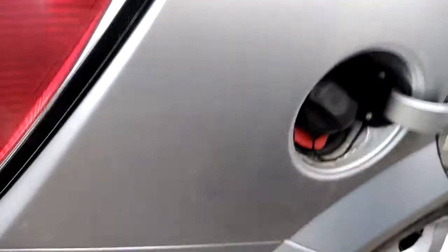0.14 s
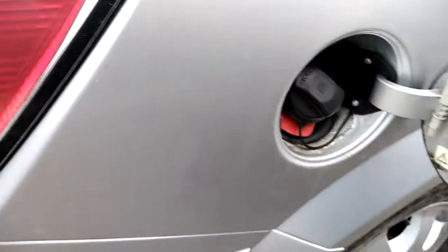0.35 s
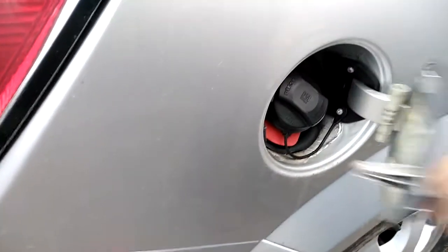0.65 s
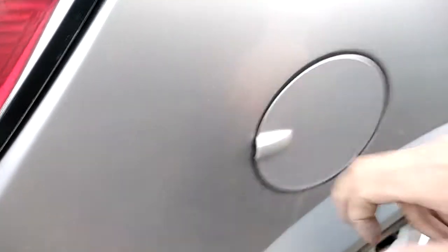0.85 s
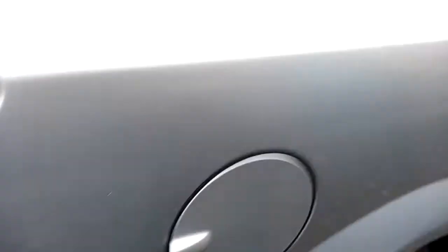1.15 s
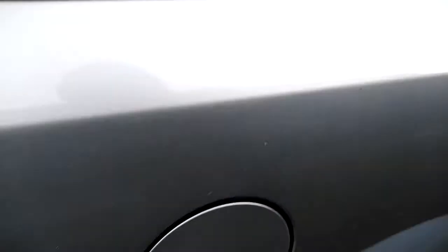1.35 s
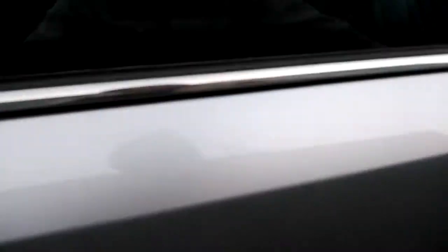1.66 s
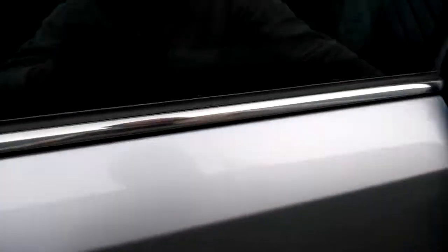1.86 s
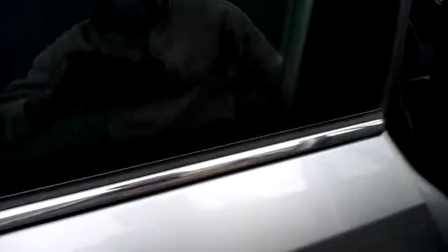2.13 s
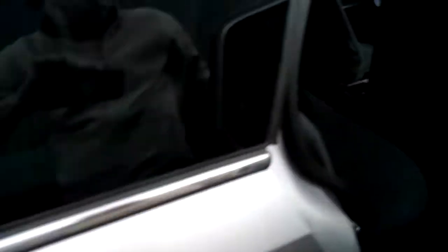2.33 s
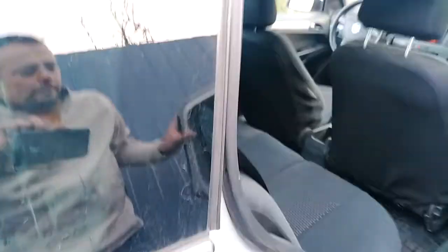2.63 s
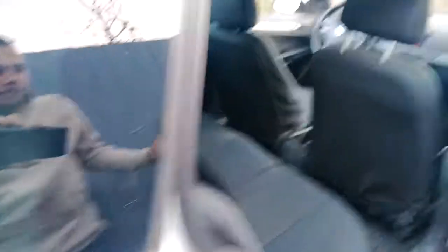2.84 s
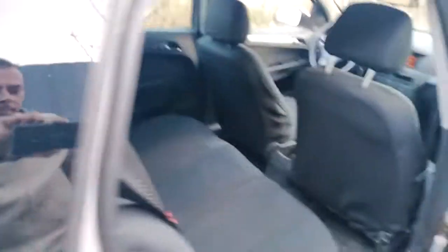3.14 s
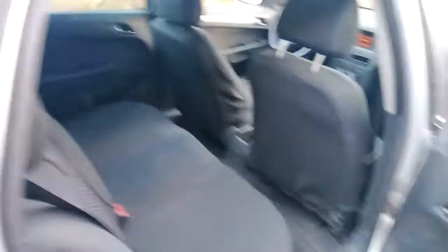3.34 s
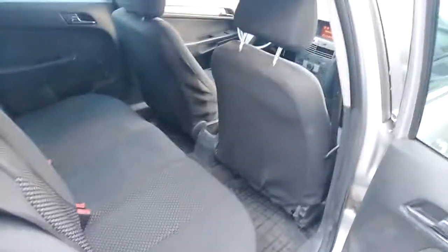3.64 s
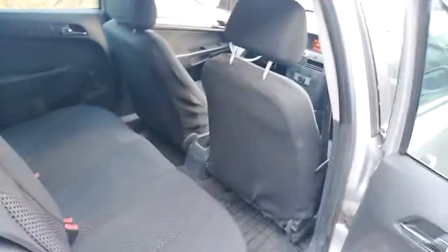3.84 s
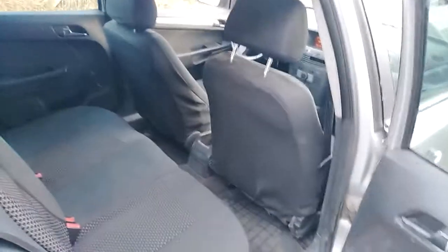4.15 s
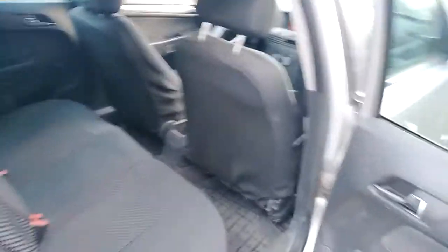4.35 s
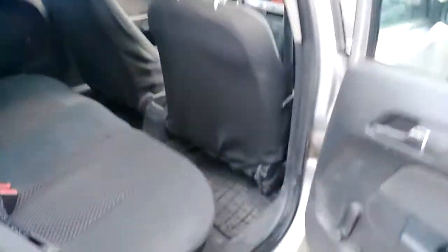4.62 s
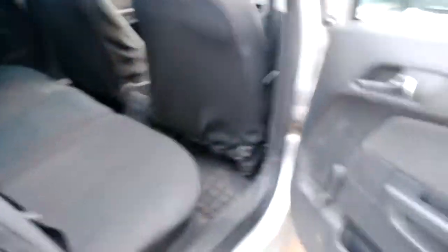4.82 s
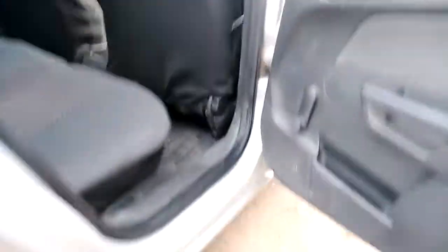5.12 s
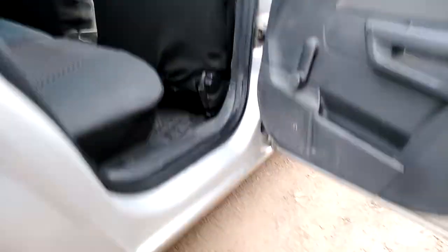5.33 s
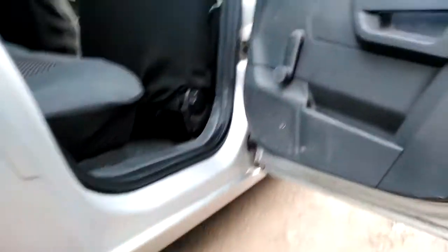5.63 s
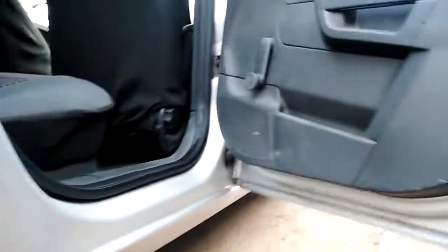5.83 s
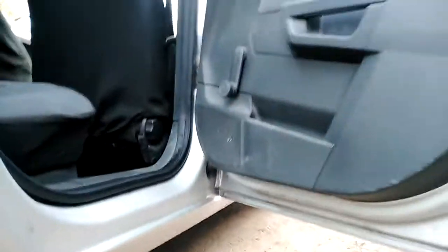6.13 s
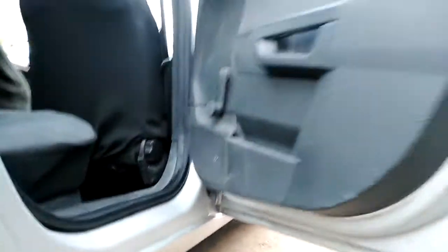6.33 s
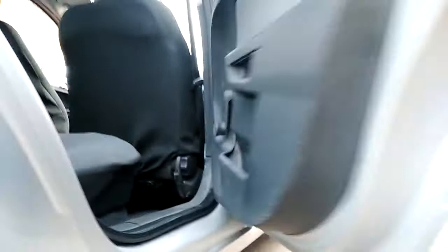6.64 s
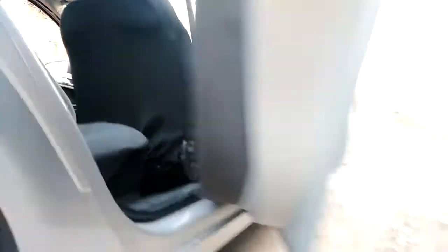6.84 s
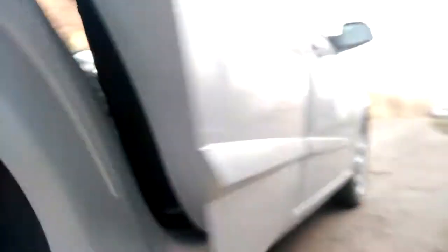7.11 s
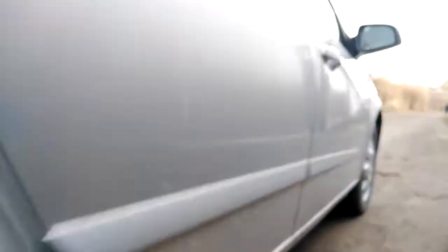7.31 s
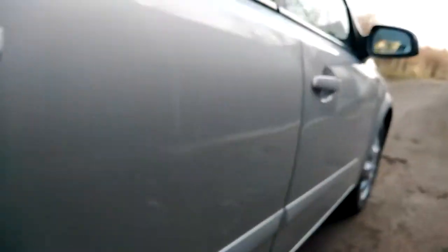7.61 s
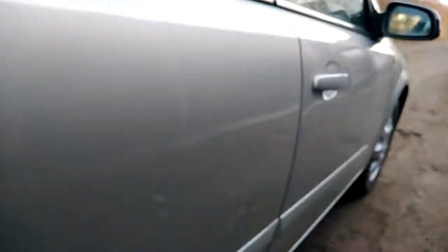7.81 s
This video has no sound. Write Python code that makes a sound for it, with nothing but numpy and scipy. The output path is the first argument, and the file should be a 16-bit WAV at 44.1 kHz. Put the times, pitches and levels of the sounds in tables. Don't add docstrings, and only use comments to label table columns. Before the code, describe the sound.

A hand works along an idling diesel car in the open air. First a sharp flap clap, then a heavy handle clunk, a metallic latch release, a faint brief squeak and a duller stop knock. For several seconds only the fast chugging idle remains, growing hissier and nearer the engine. Near the end the catch clacks and the door slams with a deep boom. Close stereo microphone, very little echo.

```python
import sys
import numpy as np
from scipy import signal
from scipy.fft import rfft, irfft, next_fast_len
from scipy.io import wavfile
from scipy.ndimage import uniform_filter1d, map_coordinates

SR = 44100
rng = np.random.default_rng(int(sys.argv[2]) if len(sys.argv) > 2 else 0)


def undo_db(level):
    steps = np.asarray(level, float) / 20
    return 10 ** steps


def transcribe(signal):
    frames = np.atleast_2d(signal).T
    limited = np.clip(frames, -1, 1)
    pcm = np.round(limited * 32767).astype(np.int16)
    wavfile.write(sys.argv[1], SR, pcm)


N = 351477

# time in seconds, how far the microphone is inside the cabin (0-1), nearness
# to the engine bay in dB, open line to the bay (0-1), delay of the right port in samples.
WALK = [(0, 0, -0.5, 0.64, 17.3), (.55, 0.14, -0.5, 0.88, 15.3), (1.0, 0, -0.5, 0.8, 15),
        (1.5, 0.1, 1.5, 0.67, 17.2), (2.0, 0.1, 1, 0.83, 17.3), (2.15, 0.6, 0, 0.7, 22),
        (2.7, 0.8, -1, 0.82, 16.6), (3.1, 1, -0.5, 0.48, 15.5), (4.4, 1, -0.5, .5, 18.3),
        (5.0, 1, 2.5, 0.56, 18), (5.5, 0.24, 5, 0.94, 3.8), (5.899, 0.23, 6, 0.94, 2.7),
        (7.2, 0, 6, 0.91, 3.3), (7.5, 0, 4.5, 0.83, 5.4), (7.97, 0.16, 5, .95, 8)]
# level in dB, loss inside the cabin in dB, dB per dB of nearness.
KNOCK_FOLLOW = (-38, 2, 0.71)


def evened(x):
    return x / np.sqrt(np.mean(x ** 2) + 1e-20)


def read(points, hz):
    f, value = np.transpose(points)
    return np.interp(np.log(hz + 1), np.log(f + 1), value)


def coloured(x, points, share=0.99):
    length = x.shape[-1]
    size = next_fast_len(length)
    gain = undo_db(share * read(points, np.fft.rfftfreq(size, 1 / SR)))
    return irfft(rfft(x, size) * gain, size)[..., :length]


def add(mix, s, sound):
    part = mix[..., round(s * SR):][..., :sound.shape[-1]]
    part += sound[..., :part.shape[-1]]


def panned(x, pan_db):
    return x * undo_db(np.array([[pan_db / 2], [-pan_db / 2]]))


def ring(x, hz, width):
    r = np.exp(-np.pi * width / SR)
    return signal.lfilter([1, 0, -1], [1, -2 * r * np.cos(2 * np.pi * hz / SR), r * r], x)


def yard(x, t60, wet_db):
    taps = rng.standard_normal((2, 6000)) * (rng.random((2, 6000)) < .04)
    taps *= undo_db(-60 * np.arange(6000) / SR / t60)
    taps /= np.linalg.norm(taps, axis=1)[:, None]
    return x + undo_db(wet_db) * signal.fftconvolve(x, taps, axes=1)[:, :N]


def heard(law, jolt_column=None):
    # time in seconds, extra hum in dB, extra drumming in dB, seconds to fall by 60 dB.
    jolts = [
        (.85, -48, -42, .9),
        (1.86, -34, -27.5, 0.83),
        (2.33, -40, -32, 0.98),
        (4.75, -70, -44, 1.5),
        (7.35, -20, -29, 0.72),
    ]
    t = np.arange(N) / SR
    s, inside, near_db = np.transpose(WALK)[:3]
    level_db, inside_db, follow = law
    gain = undo_db(level_db - inside_db * np.interp(t, s, inside) + follow * np.interp(t, s, near_db))
    for row in jolts if jolt_column else []:
        since = np.maximum(t - row[0], 0)
        rise = 1 - np.exp(-since / 0.037)
        gain = gain + undo_db(row[jolt_column] - 60 * since / row[-1]) * rise
    return gain


def struck(parts, beats, turns, air, spread_db, rough, burst_s, jitter_s):
    count = np.arange(int(turns[-1]) + 1)
    at = np.searchsorted(turns, count)
    out, fade = np.zeros(N), np.exp(-np.arange(1200) / SR / burst_s)
    for (hz, width, db, air_db), (delay, *cylinders) in zip(parts, beats):
        hits = np.zeros(N)
        size = undo_db(np.array(cylinders)[count % 4] + spread_db * rng.standard_normal(len(at)))
        late = delay + jitter_s * rng.standard_normal(len(at))
        hits[np.clip(at + (late * SR).astype(int), 0, N - 1)] = size
        burst = signal.oaconvolve(hits, fade)[:N] * rng.standard_normal(N)
        push = evened(ring(hits, hz, width))
        noise = evened(ring(burst, hz, width))
        drive = (1 - rough) * push + rough * noise
        tone = evened(ring(drive, hz, width))
        out += undo_db(db + air_db * (2 * air - 0.5)) * tone
    return evened(out)


def throb(turns, depth, fall):
    size = undo_db(2.24 * rng.standard_normal(int(turns[-1]) + 9))[turns.astype(int) + 1]
    swell = uniform_filter1d(size * np.exp(-(turns % 1) / fall), size=330, origin=60)
    return evened(1 - depth + depth * 3 * swell)


def low_hum(turns, air):
    # multiple of firing rate, level in dB, start in turns, rise in open air in dB.
    orders = [(2, 3, 0.26, -2), (3, 5, 0.29, 6), (4, -37, 0.83, 21.5), (6, -18, 0.46, -6)]
    hum_follow = (-40.5, 11.6, 0.059)
    hum = sum(undo_db(db + air_db * (2 * air - 2)) * np.cos(2 * np.pi * (k * turns + start))
              for k, db, start, air_db in orders)
    return heard(hum_follow, 1) * evened(hum)


def exhaust_boom(turns, air):
    # pitch in Hz, width in Hz, level in dB, rise in open air in dB.
    pipe_tones = [(248.8, 40.6, 2.5, 0), (244.4, 22.8, -1.5, -1.5), (200, 78, -9.5, -13),
                  (317.7, 15, -7.5, 1), (350.8, 34, -8, 2), (425.6, 35.5, -13.5, 5)]
    # delay after firing in seconds, then dB of cylinders one to four.
    pipe_beats = [(.003, -7, 0, -8, 0), (.016, -6, 0, -6, -1), (.006, -3, 0, -3, 0), (.004, 0, 0, -2, -2),
                  (0, 0, 1, -2, -2), (.002, 0, 0, 0, 0)]
    boom_follow = (-33.5, 1.5, 0.069)
    boom = struck(pipe_tones, pipe_beats, turns, air, spread_db=1.3, rough=.15, burst_s=.008, jitter_s=.0001)
    return yard(heard(boom_follow) * boom[None], t60=0.35, wet_db=-29.0)


def block_knock(turns, air):
    # pitch in Hz, width in Hz, level in dB, rise in open air in dB.
    block_tones = [(593, 91, -0.5, -9.5), (727.4, 71, 2, -1), (932, 71, -6.5, 1), (1110, 44, -6.5, 2.5),
                   (1234, 195, -4.5, 4.5), (1396, 180, -3, -7), (1728, 210, -2, 2), (2234, 400, -11.5, 0.5)]
    # delay after firing in seconds, then dB of cylinders one to four.
    block_beats = [(.004, 0, 0, 0, 0), (.006, 1, -2, -1, 2), (.004, -2, 4, 0, -3), (.002, 0, 0, 0, 0),
                   (.005, -4, -3, 6, -4), (.001, 0, 0, 3, 0), (.001, 1, 1, 0, -3), (.001, 0, 0, 0, 0)]
    knock = struck(block_tones, block_beats, turns, air, spread_db=1.5, rough=.32, burst_s=.011, jitter_s=.0003)
    return yard(heard(KNOCK_FOLLOW) * knock[None], t60=0.076, wet_db=-1.5)


def valve_wash(turns, common):
    # pitch in Hz, level in dB per Hz.
    wash_colour = [(260, -41), (450, -5), (715, 5), (1030, -4.5), (1260, -13), (1430, -2.5), (1760, -4.5),
                   (2820, -23), (3500, -6), (4550, -42), (7700, -120)]
    noise = rng.standard_normal((2, N)) + 1.54 * common
    wash = evened(coloured(noise, wash_colour)) * throb(turns, depth=0.56, fall=0.34)
    return heard(KNOCK_FOLLOW) * wash


def injector_hiss(turns, common):
    # pitch in Hz, level in dB per Hz.
    hiss_colour = [(1180, 0.5), (2000, -2.5), (2500, -6), (2750, -7), (3330, -9.5), (3920, -12.5),
                   (4390, -6.5), (4930, -8), (6200, -4), (6960, -3.5), (7930, 1.0), (10200, -17.5),
                   (14200, -30.5), (14700, -90)]
    hiss_follow = (-40.5, 0.092, 1.017)
    noise = rng.standard_normal((2, N)) + 0.27 * common
    hiss = evened(coloured(noise, hiss_colour)) * throb(turns, depth=0.35, fall=0.49)
    return heard(hiss_follow) * hiss


def engine():
    t = np.arange(N) / SR
    s, *columns = np.transpose(WALK)
    air, lag = (np.interp(t, s, c) for c in columns[2:])
    turns = 27.826 * t + .12
    common = rng.standard_normal(N)
    near = exhaust_boom(turns, air) + block_knock(turns, air)
    body = undo_db(-1.5) * near + undo_db(-5.5) * valve_wash(turns, common)
    body[1] = map_coordinates(body[1], [np.arange(N) - lag], order=3)
    return low_hum(turns, air) + body + undo_db(3.0) * injector_hiss(turns, common)


def drumming():
    drum_follow = (-51, 13, -0.37)
    one, *pair = rng.standard_normal((3, N))
    lumps = ring(ring(one + .3 * np.array(pair), 165., 80.), 150., 90.)
    slow = uniform_filter1d(uniform_filter1d(rng.standard_normal(N), size=6000), size=6000)
    swell_db = 4 * evened(slow)
    return evened(lumps) * undo_db(swell_db) * heard(drum_follow, 2)


def rattle(colour, peak_db, pan_db, length, t60):
    t = np.arange(int(.25 * SR)) / SR
    clicks = rng.standard_normal((2, len(t))) * undo_db(3.4 * rng.exponential(1, len(t)))
    clicks = clicks + 0.11 * clicks[::-1]
    shape = np.minimum(t / 0.00047, 1) * undo_db(-60 * np.maximum(t - length, 0) / max(t60, .01))
    return panned(undo_db(peak_db - 7.5) * evened(coloured(clicks, colour)) * shape, pan_db)


def metal_rattles(hand):
    # pitch in Hz, level in dB per Hz.
    SPRING = [(290, -26), (500, -4), (896, -15), (1520, -7), (1720, -10), (3610, -24.5), (8130, -8),
              (14000, -35), (15000, -46)]
    LINKAGE = [(1470, -52), (2500, -13), (3050, -10), (3260, -15), (4310, -8.5), (7650, 0), (13900, -24),
               (14500, -33)]
    PAWL = [(350, -28), (600, 6), (877, -6), (1900, 3), (3090, -14.5), (3730, -9), (4100, -16), (4760, -9),
            (8530, -8.5), (10400, -24), (13700, -31), (15300, -50)]
    STRIKER = [(530, -27), (900, 2.5), (1790, -10), (1920, -10), (2190, -3.5), (3430, -9.5), (4350, -8),
               (7320, 0), (12500, -14), (15300, -40)]
    # (start in seconds, peak in dB, left minus right in dB, length in seconds).
    clatter = [
        (SPRING, 0.027, [(0.7927, -11, -1.5, 0.011)]),
        (LINKAGE, 0.056, [(1.84, -19.5, -4, 0.0081), (1.905, -39, 4.5, .0089), (1.961, -26.5, 3, .0081), (2.039, -30, 3, 0.019)]),
        (PAWL, 0.071, [(2.2902, -3.5, -0.5, 0.011)]),
        (STRIKER, 0.056, [(7.2868, -9.5, -13, 0.0053), (7.299, -3.5, -5, 0.0077)]),
    ]
    for colour, t60, rows in clatter:
        for s, *how in rows:
            add(hand, s, rattle(colour, *how, t60))


def blow(modes, peak_db, pan_db, shudder_db, t60, thud_hz):
    t = np.arange(int(.6 * SR)) / SR
    thud = np.sin(2 * np.pi * thud_hz * t) * undo_db(-60 * t / 0.028)
    panel = sum(undo_db(db - 60 * t / min(life, 40 / hz)) * np.sin(2 * np.pi * hz * t) for hz, db, life in modes)
    clean = (thud + undo_db(-0.5) * panel / abs(panel).max()) * (1 - np.exp(-t / 0.002))
    shake = rng.standard_normal((2, len(t))) + 0.81 * rng.standard_normal(len(t))
    shake = sum(undo_db(db) * evened(ring(ring(shake, hz, .5 * hz), hz, .5 * hz)) for hz, db, life in modes)
    fade = undo_db(shudder_db - 60 * t / max(t60, .02)) * (1 - np.exp(-t / 0.00099))
    shake = evened(shake) * fade
    lowest_hz = 0.67 * min(modes)[0]
    cut = signal.butter(2, lowest_hz, "high", fs=SR, output="sos")
    return undo_db(peak_db) * signal.sosfilt(cut, panned(clean / abs(clean).max(), pan_db) + shake)


def panel_blows(hand):
    # pitch in Hz, level in dB, seconds to fall by 60 dB.
    FLAP = [(216, 3.5, 0.2), (316, 2, 0.03), (531, 24.5, 0.021), (682, 8, 0.14), (860, -11, 0.18),
            (1100, -30, 0.06), (1314, -37, 0.1)]
    HANDLE = [(203, 6.5, 0.035), (428, -8.0, 0.12), (543, -38, 0.36), (586, -13.5, 0.099), (619, -9, 0.15),
              (720, -35, 0.2), (960, -44, 0.27), (1082, -43, 0.46), (1190, -49, 0.33), (121, -11, 0.063),
              (288, -6.0, 0.091)]
    LATCH = [(165.0, 1.5, 0.28), (271, -0.5, 0.24), (499, -1.0, 0.15), (630, -15, 0.51), (634, -11, 0.21),
             (786, -35, 0.082), (1114, -45, 1.0), (1351, -34, 0.13), (2020, -38, 0.11), (2420, -40, 0.081),
             (216, -1, 0.26)]
    STOP = [(288, -6, 0.41), (470, 2, 0.12), (565, 5.5, 0.086), (965, 2, 0.035), (1351, -30, 0.11),
            (1657, -19, 0.082), (1760, -32, 0.09), (1970, -0.5, 0.076), (367, 1.7, 0.16), (747, 3.3, 0.074)]
    CATCH = [(279, 7, 0.11), (391, 6, 0.13), (575, 6.5, 0.16), (630, -28, 0.82), (837, -20, 6.1),
             (1066, -32, 1.9), (1335, -6, 0.036)]
    DOOR = [(67.0, 5.5, 0.2), (164.0, -1, 0.66), (267, 7.5, 0.17), (418, 0, 0.3), (494, -37, 0.75),
            (640, -24, 0.16), (720, -41, 0.82), (807, -33, 5.0), (861, -43, 0.62), (122.2, -4.5, 0.4),
            (209, 8, .2)]
    # (start in seconds, peak in dB, left minus right in dB, shudder in dB).
    blows = [
        (FLAP, 257, .11, [(0.804, 2.5, 0, -17.5), (0.825, -11, -4, -32)]),
        (HANDLE, 155, 0.23, [(1.844, 1.4, 1.5, -13), (1.861, -4, -3, -25), (1.896, -13.5, 1, -20), (1.916, -11, -1, -28), (2.039, -34, -1.1, 2)]),
        (LATCH, 220, 0.14, [(2.299, -1.5, -1, -8), (2.321, -8.5, 1.1, -25), (2.351, -9.5, 2, -19), (2.387, -20.5, -1, -28)]),
        (STOP, 397, 0.098, [(2.908, -32, 11, -17), (2.968, -5, 2.5, -13)]),
        (CATCH, 366, .13, [(7.227, -39, -1.1, 4), (7.267, -10.5, -5, -3.5), (7.287, -5, -1, -9)]),
        (DOOR, 270, .21, [(7.324, 0.3, -2.1, -7.5), (7.399, -12.5, -3, -13)]),
    ]
    for modes, thud_hz, t60, rows in blows:
        for s, *how in rows:
            add(hand, s, blow(modes, *how, t60, thud_hz))


def creak():
    # time in seconds, pitch in Hz, level in dB.
    whistle = [
        (2.49, 1273, -54),
        (2.512, 1185, -41),
        (2.558, 1350, -40),
        (2.59, 1204, -52),
        (2.668, 1240, -49),
        (2.68, 1110, -67),
    ]
    s, hz, db = np.transpose(whistle)
    t = np.arange(s[0], s[-1], 1 / SR)
    wobble = 1 + 0.44 * uniform_filter1d(rng.standard_normal(len(t)), 200)
    tone = np.sin(2 * np.pi * np.cumsum(np.interp(t, s, hz) * wobble) / SR)
    return s[0], np.sqrt(2) * tone * undo_db(np.interp(t, s, db)) * signal.windows.tukey(len(t), .2)


def scene():
    idle = engine() + drumming()
    hand = np.zeros((2, N))
    metal_rattles(hand)
    panel_blows(hand)
    start, squeak = creak()
    add(hand, start, panned(squeak, 2.5))
    return idle + yard(hand, t60=.1, wet_db=-14.)


def top_cut(x):
    return signal.sosfilt(signal.butter(12, 14950, fs=SR, output="sos"), x)


def record(dry):
    # pitch in Hz, left minus right in dB.
    port_difference = [(60, 1.5), (250, 3.5), (1000, 1), (2500, 4), (5000, -0.5), (8000, 7), (10500, 12),
                       (12500, 14.5)]
    left = coloured(dry[0], port_difference, .5)
    right = coloured(dry[1], port_difference, -.5)
    bass_cut = signal.butter(2, 45., "high", fs=SR, output="sos")
    ports = signal.sosfilt(bass_cut, np.array([left, right]))
    return top_cut(np.clip(ports, -1, 1))


dry = scene()
out = record(dry)
transcribe(out)
```